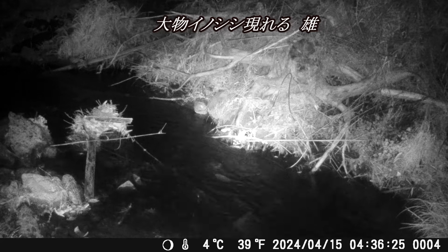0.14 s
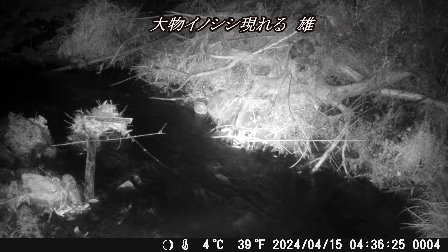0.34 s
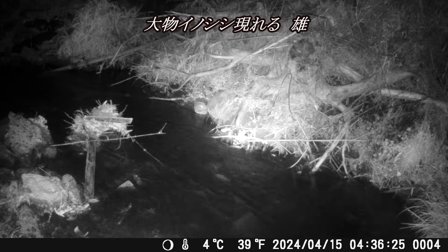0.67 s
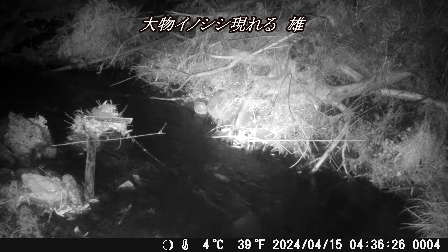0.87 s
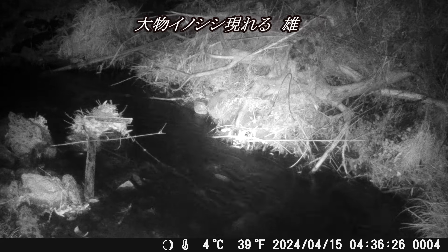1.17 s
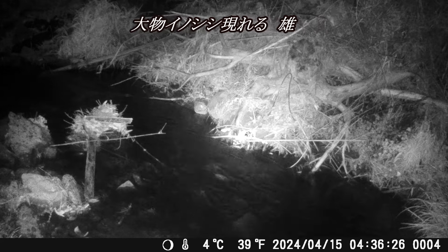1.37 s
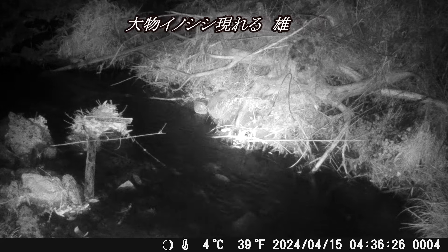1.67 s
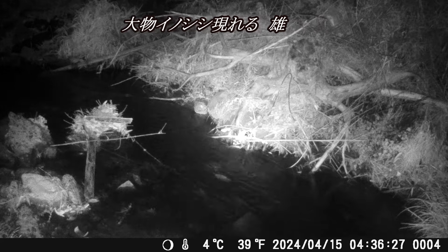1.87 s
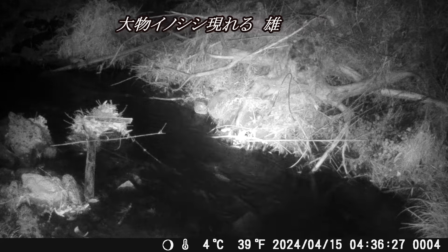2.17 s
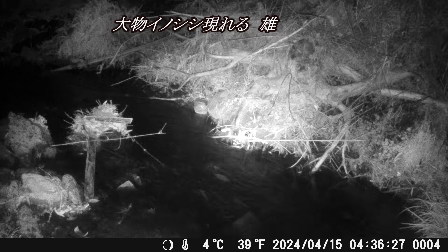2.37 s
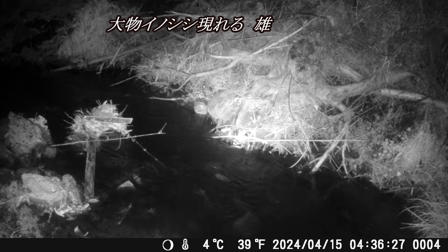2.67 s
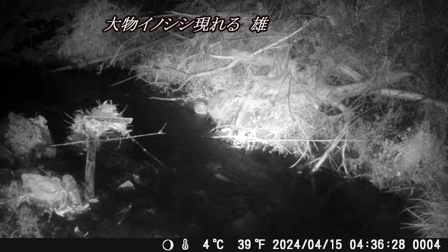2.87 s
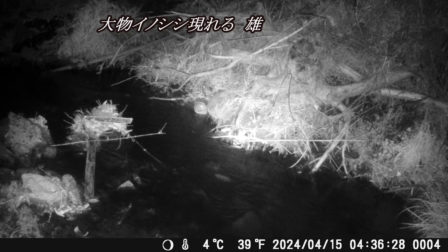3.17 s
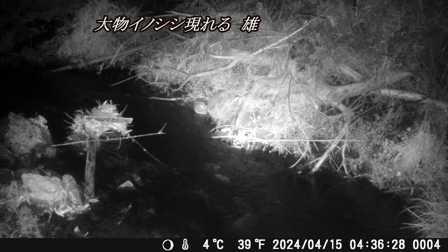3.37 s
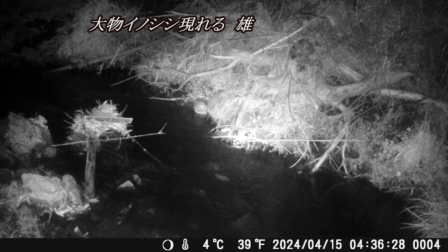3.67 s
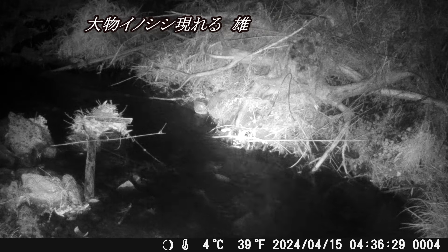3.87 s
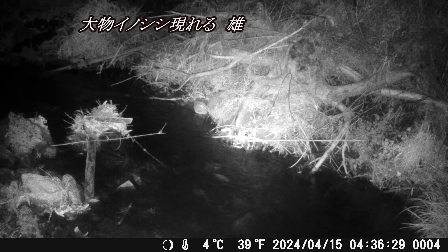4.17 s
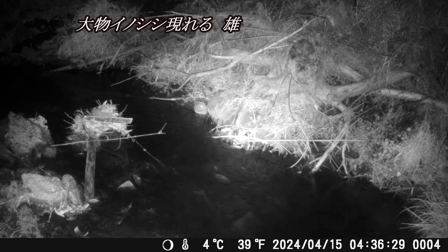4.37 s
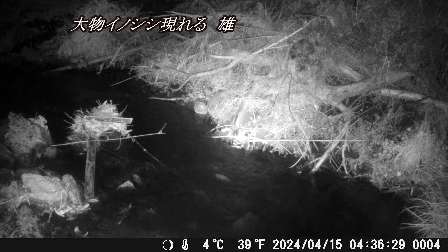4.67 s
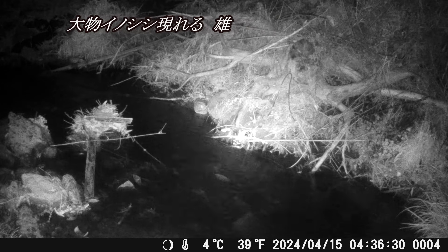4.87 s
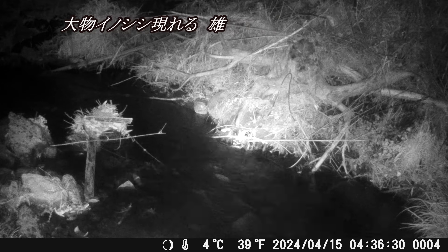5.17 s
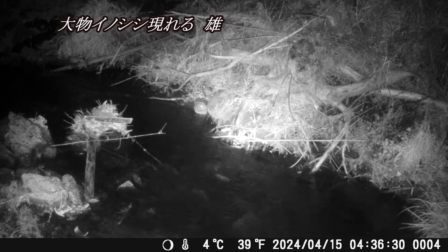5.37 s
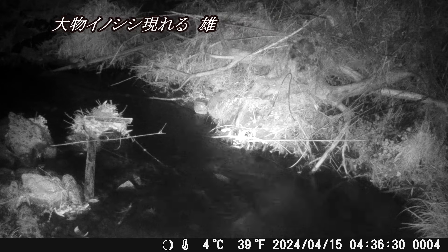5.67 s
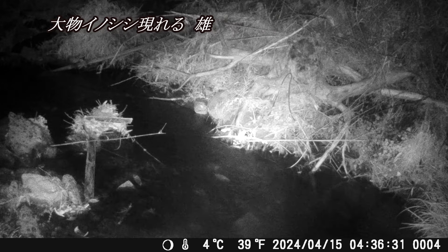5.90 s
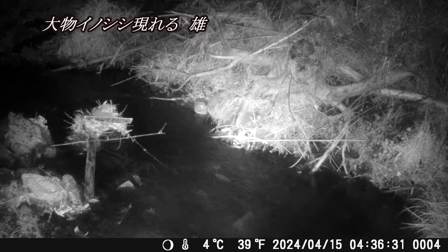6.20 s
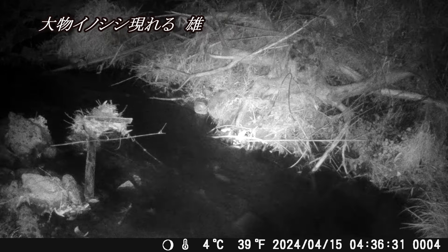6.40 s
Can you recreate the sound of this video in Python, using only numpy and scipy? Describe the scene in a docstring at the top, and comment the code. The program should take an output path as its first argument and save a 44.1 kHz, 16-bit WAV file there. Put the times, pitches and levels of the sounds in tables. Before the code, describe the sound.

A shallow stream trickles softly in the open throughout, a faint wash dotted with tiny bubbles. In the first second, light drips and ticks plink; a sharper click lands at about 1.5 s over a faint, low engine hum. From 2.2 to 2.7 s an unseen animal makes a quick cluster of small splashes. A vehicle on a road some way off then swells, its deep rumble and soft roar strongest from about 2.8 to 3.7 s, with a brief whine near 3.5 s. At 3.6 s wading resumes, with bright slaps, fizz and gurgles crowding together most densely from 3.9 to 4.7 s while the vehicle fades to a low hum. After 5 s the splashes become smaller and sparser, with isolated drips and upward-gliding bubbles until 6.5 s. The small microphone dulls the treble and adds faint hiss; short echoes come off the banks.

```python
"""Wading through a shallow stream

A shallow stream trickles at night: bands of noise with small ringing bubbles standing out of them.
A vehicle passes on a road some way off: shaped noise for rumble and roar, sines for hum and whine.
An animal wades through the water out of sight: bursts of fizz and gurgle, with ringing drops and bubbles.
A small microphone rolls off steeply above about 3 kHz and adds a faint hiss."""
import sys
import numpy as np
from scipy import signal
from scipy.io import wavfile
from scipy.ndimage import uniform_filter1d

SR = 44100
rng = np.random.default_rng(int(sys.argv[2]) if len(sys.argv) > 2 else 0)


def log_audio(samples):
    """Write samples as a 16-bit WAV file to the path given in sys.argv[1]."""
    # one column per channel
    frames = np.atleast_2d(samples).T
    # limit to full scale, then quantise
    limited = np.clip(frames, -1, 1)
    pcm = np.round(limited * 32767).astype(np.int16)
    wavfile.write(sys.argv[1], SR, pcm)


N = 288414

# how hard the water is stirred between splashes: (time [s], level [dB])
STIR = [(0.0, -51.5), (0.14, -60), (2.02, -61), (2.4, -56.5), (3.01, -56), (3.52, -70), (3.99, -49.5),
        (4.35, -56), (4.6, -53), (5.45, -53.5), (6.54, -58.5)]


def amp(db):
    """Decibels to an amplitude factor."""
    return 10 ** (np.asarray(db) / 20)


def evened(x):
    """Scale to an RMS of 1."""
    return x / np.sqrt(np.mean(x ** 2) + 1e-20)


def read(points, hz):
    """Level of a spectral curve at hz, straight between its points on a log frequency axis."""
    f, value = np.transpose(points)
    return np.interp(np.log(hz + 1), np.log(f + 1), value)


def along(rows):
    """Each column of a table of curves, one value a sample."""
    s, *columns = np.transpose(rows)
    return [np.interp(np.arange(N) / SR, s, c) for c in columns]


def add(mix, s, sound):
    """Mix a sound in place from s seconds on, cut at the end."""
    part = mix[round(s * SR):][:len(sound)]
    part += sound[:len(part)]


def noise(points, size, patchy_db):
    """Shaped noise from random short-time spectra with smooth louder and softer patches; RMS 1."""
    frames, hz = 4 * N // size + 5, np.fft.rfftfreq(size, 1 / SR)
    real, imag, patches = np.moveaxis(rng.standard_normal((frames, len(hz), 3)), 2, 0)
    patches = uniform_filter1d(patches, size=8, axis=0)  # smooth in time
    patches = evened(uniform_filter1d(patches, size=8, axis=1))  # smooth in frequency
    spectra = (real + 1j * imag) * amp(read(points, hz) + patchy_db * patches)
    sound = signal.istft(spectra.T, nperseg=size, noverlap=3 * size // 4)[1]
    return evened(sound[:N])


def ping(hz, t60, rise=0., ramp=1.0):
    """A dying sine, as of ringing trapped air; climbs rise octaves/s, starts over ramp cycles; peak 1."""
    t = np.arange(int(max(t60, 1e-3) * SR)) / SR
    turns = np.cumsum(hz * 2 ** (rise * t)) / SR
    attack = np.minimum(t * hz / ramp, 1)
    ring = np.sin(2 * np.pi * turns) * amp(-60 * t / t60) * attack
    return ring / abs(ring).max()


def grains(points, per_s, cycles, spread_db, top_hz=6000, count=16):
    """Many small bubbles of count pitches ring at random moments, a few much stronger; RMS 1."""
    happens = rng.random(N) < per_s / SR
    size = amp(spread_db * np.minimum(rng.exponential(1, N), 5)) * happens
    kind, out = rng.integers(0, count, N), np.zeros(N)
    for k, hz in enumerate(np.geomspace(350, top_hz, count)):
        grain = ping(hz, np.log(1000) * cycles / hz / np.pi, rise=15.0)
        grain_level = amp(read(points, hz)) * np.sqrt(hz) / np.linalg.norm(grain)
        out += grain_level * signal.oaconvolve(size * (kind == k), grain)[:N]
    return evened(out)


def stream():
    """Countless far bubbles blur into a wash, with nearer bubbles standing out of it."""
    # spectrum of the wash: (frequency [Hz], relative density [dB per Hz])
    wash_curve = [(12, -37), (25, -2.5), (70, 1), (100, -8), (140, -24.5), (270, -18.5), (400, -21),
                  (1000, -28.5), (1600, -16), (2400, -14.5), (3200, -20), (7000, -22.5)]
    near = grains(wash_curve, per_s=980.0, cycles=11.0, spread_db=8.5)
    wash = noise(wash_curve, size=1024, patchy_db=3.0)
    return amp(-55) * wash + amp(-67.0) * near


def road_noise():
    """Low rumble, exhaust boom, body drone and tyre roar: four noise bands that swell as the vehicle passes."""
    # the pass: (time [s], rumble level [dB], drone level [dB], roar level [dB])
    pass_curves = [(0.0, -49, -71.5, -66), (1.0, -48, -68.5, -63.5), (1.53, -46.5, -67, -61.5),
                   (2.18, -51, -66.5, -61), (2.39, -42.5, -64, -59), (2.58, -50, -66.5, -56),
                   (2.77, -34, -55, -51.5), (2.93, -30, -52, -48), (3.26, -35, -49, -45.5),
                   (3.52, -31.5, -52, -46), (3.7, -32, -51, -48), (4.02, -41, -60.5, -58),
                   (4.4, -46.5, -57, -60), (4.88, -50.5, -59, -62.5), (5.2, -39, -64, -57.5),
                   (5.43, -44.5, -66, -65), (5.88, -53.5, -71.5, -61.5), (6.14, -40, -65, -63.5),
                   (6.54, -48.5, -70.5, -64.5)]
    # the exhaust boom: (time [s], level [dB])
    boom_curve = [(0.0, -69.5), (1.0, -68.5), (1.5, -65), (2.3, -60.5), (2.6, -58.5), (2.8, -48.5),
                  (3.5, -51), (4.0, -58), (4.4, -66), (4.85, -68), (5.15, -64.5), (5.8, -73.5),
                  (6.03, -60.5), (6.54, -79)]
    # spectra of the four bands: (frequency [Hz], relative density [dB per Hz])
    rumble_band = [(12, -8), (25, 6.5), (65, -5.5), (95, -22), (130, -59)]
    boom_band = [(70, -23.5), (100, 2), (140, 0), (175, 0), (210, -32.5)]
    drone_band = [(160, -27), (200, -3.5), (245, -0.5), (285, -6), (340, -12), (450, -36.5)]
    roar_band = [(280, -17.5), (460, -4), (800, -1), (1120, 1.5), (1530, -7), (2800, -10.5), (6000, -36.5)]

    rumble_db, drone_db, roar_db = along(pass_curves)
    boom_db, = along(boom_curve)
    rumble = noise(rumble_band, size=4096, patchy_db=0)
    rumble /= np.sqrt(uniform_filter1d(rumble ** 2, size=6000))  # steady over about 0.14 s
    out = amp(rumble_db) * rumble
    out += amp(boom_db) * noise(boom_band, size=2048, patchy_db=0.5)
    out += amp(drone_db) * noise(drone_band, size=2048, patchy_db=1.5)
    out += amp(roar_db) * noise(roar_band, size=512, patchy_db=1.5)
    return out


def tone(rows, orders):
    """A sine on a curve of pitch and level, with overtones; each partial wavers in level at random."""
    waver_db, overtone_waver_db, waver_s = 1.5, 2.5, .05
    s, *columns = np.transpose(rows)
    t = np.arange(s[0], s[-1], 1 / SR)
    hz, db = (np.interp(t, s, c) for c in columns)
    turns, span = np.cumsum(hz) / SR, int(waver_s * SR)
    chance = rng.standard_normal((N, len(orders) + 1)).T
    waver = evened(uniform_filter1d(uniform_filter1d(chance, span), span))[:, :len(t)]
    wave = amp(waver_db * waver[0]) * np.sin(2 * np.pi * turns)
    for (order, order_db), own in zip(orders, waver[1:]):
        wave += amp(order_db + overtone_waver_db * own) * np.sin(2 * np.pi * order * turns)
    fades = signal.windows.tukey(len(t), .1)
    return s[0], np.sqrt(2) * amp(db) * wave * fades


def engine_hum():
    """The engine hums at its firing rate and low multiples of it, in four stretches."""
    # one list a stretch: (time [s], firing rate [Hz], level of the fundamental [dB])
    stretches = [
        [(1.15, 68.6, -59.5), (1.622, 67.1, -52), (1.9, 67.7, -57.5), (2.068, 79.5, -50), (2.1, 80.1, -58)],
        [(2.7, 56.4, -46), (2.956, 56.8, -35), (3.194, 57.3, -47), (3.31, 65.1, -49), (3.466, 69.4, -43.5),
         (3.596, 68.3, -35), (3.7, 66.5, -52)],
        [(3.75, 54.5, -58), (3.91, 54.07, -45.5), (4.3, 53.68, -45.5), (4.72, 54.52, -43), (4.92, 54.8, -52),
         (5.0, 55.15, -46.5), (5.25, 52.6, -46)],
        [(5.22, 54.9, -55), (5.37, 58.93, -44), (5.51, 62.5, -53.5), (6.4, 63.23, -59)],
    ]
    # overtones: (multiple of the firing rate, level before the stretch's own offset [dB])
    hum_orders = [(2, -19), (3, -19.5), (4, -19.5)]
    # offset of all overtones, one a stretch: level [dB]
    overtone_offsets = [-3.5, -11, -0.5, -4.5]
    out = np.zeros(N)
    for rows, over_db in zip(stretches, overtone_offsets):
        orders = [(order, db + over_db) for order, db in hum_orders]
        add(out, *tone(rows, orders))
    return out


def whine():
    """Three short swells of a steady sine near 250 Hz as the vehicle goes by."""
    # the swells: (time of the top [s], pitch [Hz], RMS level at the top [dB])
    swells = [(3.45, 244.7, -39.5), (3.572, 252.7, -42.5), (3.735, 264.6, -43.5)]
    slope_db_per_s = 450  # up to the top and down again
    t = np.arange(N) / SR
    out = np.zeros(N)
    for s, hz, db in swells:
        level = np.sqrt(2) * amp(db - slope_db_per_s * abs(t - s))
        out += level * np.sin(2 * np.pi * hz * t)
    return out


def vehicle():
    """The passing vehicle: broad road noise with the engine's hum and a brief whine."""
    return road_noise() + engine_hum() + whine()


def splashing():
    """Stirred water: bubble fizz over a rush; each footfall swells it, with its own share of low gurgle."""
    # spectrum of the water: (frequency [Hz], relative density [dB per Hz])
    splash_curve = [(250, -25), (420, -11.5), (700, -18.5), (1000, -8), (1500, -6), (2000, -3.5), (2600, 3),
                    (3500, 0.5), (7000, -10)]
    # splashes of a wading foot: (start [s], level [dB], fall by 60 dB [s], tilt of the low half [dB])
    footfalls = [(2.244, -43.5, 0.052, 5), (2.345, -52, 0.08, 3), (2.42, -49.5, 0.45, -0.5),
                 (2.569, -40, 0.062, -12), (2.63, -46, 0.091, 5), (3.595, -45, .1, 0),
                 (3.625, -40, 0.22, -24), (3.675, -38.5, 0.22, 6), (3.76, -47.5, 0.36, 12),
                 (3.897, -35.5, 0.19, 2), (3.955, -46, 0.43, 8), (4.02, -37, 0.17, 7.5),
                 (4.054, -39, 0.07, 5), (4.205, -40.5, 0.2, -5), (4.234, -40.5, 0.44, 7.5),
                 (4.3, -44, 0.52, 3.5), (4.48, -42, 0.063, -6), (4.555, -43, 0.39, 6),
                 (4.625, -48, 0.56, 10.5), (4.685, -40, 0.23, 1), (4.845, -45.5, 0.27, -5),
                 (4.915, -45.5, 0.11, -13), (4.97, -43, 0.1, -7), (5.045, -50, 0.054, -4),
                 (5.17, -55, 0.6, 10), (5.509, -48.5, 0.27, -1), (5.569, -59.5, 0.25, 21),
                 (5.729, -47, 0.13, 10), (6.227, -46, 0.07, 6)]
    stir_gurgle_db, rise_share = 2.4, 0.088  # low tilt of the stirring; rise as a share of the fall time

    level_db, = along(STIR)
    high_power, low_power = amp(level_db) ** 2, amp(level_db + stir_gurgle_db) ** 2
    for s, db, t60, gurgle_db in footfalls:
        rise = rise_share * t60
        t = np.arange(int((rise + t60) * SR)) / SR
        swell = np.minimum(t / rise, 1) * amp(db - 60 * np.maximum(t - rise, 0) / t60)
        add(high_power, s, swell ** 2)
        add(low_power, s, (amp(gurgle_db) * swell) ** 2)

    fizz = grains(splash_curve, per_s=2500., cycles=5.9, spread_db=1.0)
    rush = noise(splash_curve, size=256, patchy_db=4.5)
    water = evened(fizz + 1.36 * rush)
    low = signal.sosfiltfilt(signal.butter(2, 1500, fs=SR, output="sos"), water)
    high = water - low
    # larger pockets of air
    gurgle = grains(splash_curve, per_s=300., cycles=3.0, spread_db=3.0, top_hz=1410, count=8)
    return np.sqrt(high_power) * high + np.sqrt(low_power) * (low + 0.14 * gurgle)


def small_drops():
    """Fainter drops at random moments, louder where the water is stirred harder; rows as in drops()."""
    count, low_hz, high_hz, over_stir_db = 60, 1900, 4180, 10
    when, pitch, tick = rng.random((count, 3)).T
    s = when * N / SR
    db = np.interp(s, *np.transpose(STIR)) + over_stir_db
    hz = low_hz * (high_hz / low_hz) ** pitch
    return list(zip(s, db, hz, tick))


def drops():
    """Each drop mixes a tick of a few cycles with a longer ring whose pitch climbs."""
    # the loudest drops and slaps:
    # (time [s], level shared by ring and tick [dB], starting pitch [Hz], share of broad tick [0-1])
    loud_drops = [(0.0619, -33, 2400, 1), (0.134, -45, 2150, 0.4), (0.1897, -38, 2350, 1),
                  (0.3323, -45.5, 2550, 0.2), (0.4487, -37.5, 2870, 0), (0.534, -37, 2600, 0.2),
                  (0.6703, -41, 2040, 0), (0.734, -36, 3850, 0), (1.254, -43, 2440, 0.4),
                  (1.538, -23.5, 5300, 0.3), (1.5863, -45.5, 1850, 0), (1.6306, -44, 1930, 0.1),
                  (1.8623, -44.5, 3080, 0.2), (1.9, -43, 3560, 0.1), (2.05, -45.5, 3660, 0),
                  (2.129, -46, 2300, 0), (2.246, -33.5, 2740, 0), (2.3459, -31, 2550, 0.65),
                  (2.3957, -32, 5670, 0.5), (2.4094, -37, 2720, 0.25), (2.4254, -34, 2690, 0.16),
                  (2.4453, -33.5, 1980, 0.6), (2.508, -39, 2580, 0.3), (2.574, -37, 2030, 0.7),
                  (2.6297, -29.5, 2690, 0.25), (2.634, -30.5, 2210, 0.1), (3.5968, -30, 2510, 0.59),
                  (3.604, -39, 2400, 0.58), (3.6288, -28.5, 2420, 0), (3.6512, -21.5, 3270, 0.34),
                  (3.6772, -29, 2660, 0.65), (3.6956, -35, 2770, 0.5), (3.8995, -27, 3020, 1),
                  (3.9066, -21.5, 2370, 0.66), (3.916, -43, 2940, 0.3), (3.9288, -31.5, 2570, 0.2),
                  (4.002, -31.5, 3170, 0.27), (4.038, -31, 2670, 0.4), (4.076, -41, 2660, 0.2),
                  (4.2145, -37, 2420, 0.3), (4.241, -29.5, 2670, 0.7), (4.242, -24, 5000, 0.7),
                  (4.258, -27.5, 2450, 0.5), (4.2736, -27, 2350, 0.6), (4.28, -29, 2420, 0.28),
                  (4.326, -35, 2060, 0.1), (4.415, -36.5, 2730, 0.3), (4.4865, -33.5, 2735, 0.7),
                  (4.5186, -36, 2920, 0.8), (4.562, -36, 2830, 0.2), (4.5677, -33, 2710, 1),
                  (4.5814, -29.5, 2500, 1), (4.585, -27, 6360, 0.7), (4.6605, -30.5, 2180, 0.6),
                  (4.9498, -31, 5470, 0.55), (4.9725, -35, 2830, 0.09), (4.9855, -37, 2800, 0),
                  (5.003, -39.5, 2570, 0.6), (5.05, -44, 2200, 0.7), (5.1835, -33, 2180, 1),
                  (5.2269, -34.5, 2420, 0.86), (5.299, -36, 1960, 0.7), (5.3588, -36, 2500, 0.4),
                  (5.5194, -31.5, 3050, 0.65), (5.616, -35.5, 2740, 0.44), (5.647, -38, 2660, 0.3),
                  (5.777, -39.5, 2480, 0.15), (5.8314, -38.5, 2970, 0.37), (5.974, -35.5, 3030, 0.9),
                  (6.054, -38, 2040, 0.74), (6.2334, -39, 2897, 1), (6.496, -39, 2230, 1)]
    ring_cycles = 34.7  # until a pure ring is 60 dB down; fewer the more the drop is a tick
    out = np.zeros(N)
    for s, db, hz, tick in [*loud_drops, *small_drops()]:
        ring_s = ring_cycles * (1 - 0.38 * tick) / hz
        add(out, s, amp(db) * (1 - tick) * ping(hz, ring_s, rise=4.5))
        add(out, s, 1.6 * amp(db) * tick * ping(hz, 4.5 / hz, ramp=.8))
    return out


def bubble(first_hz, last_hz, length):
    """A larger bubble swells and fades while its pitch glides; random ripples shake pitch and level."""
    u = np.linspace(0, 1, int(length * SR))
    ripple = evened(uniform_filter1d(rng.standard_normal((2, 2400)), size=120))[:, :len(u)]
    hz = first_hz * (last_hz / first_hz) ** (u ** 1.1) * (1 + 0.066 * ripple[0])
    turns = np.cumsum(hz) / SR
    swell = np.sin(np.pi * u ** .7) ** 0.76
    return np.sin(2 * np.pi * turns) * swell * amp(1.4 * ripple[1])


def small_bubbles():
    """Fainter bubbles at random moments, louder where the water is stirred harder; rows as in bubbles()."""
    count, low_hz, high_hz, over_stir_db = 60, 780, 2200, 1
    most_climb, mean_cycles = 0.27, 24.  # octaves; cycles before the cap on length
    when, pitch, climb, cycles = rng.random((count, 4)).T
    s = when * N / SR
    hz = low_hz * (high_hz / low_hz) ** pitch
    db = np.interp(s, *np.transpose(STIR)) + over_stir_db
    length = np.minimum(mean_cycles * (.5 + cycles) / hz, .05)
    return list(zip(s, db, hz, most_climb * climb, length))


def bubbles():
    """Larger bubbles sing one by one, most of them gliding upward."""
    # the loudest bubbles, before the ripples:
    # (time [s], peak level [dB], first pitch [Hz], climb [octaves], length [s])
    loud_bubbles = [(0.385, -54.5, 1090, 0.2, 0.033), (0.423, -58, 1102, -0.045, 0.036),
                    (0.455, -54, 1200, 0.18, 0.024), (0.635, -50.5, 1360, 0.18, 0.012),
                    (0.759, -57, 601, 0.56, 0.039), (0.868, -55, 930, 0.24, 0.012),
                    (1.66, -57.5, 657, 0.49, 0.028), (2.008, -53, 1550, 0.039, 0.018),
                    (2.346, -49.5, 710, 0.26, 0.011), (2.365, -45.5, 1410, 0.082, 0.0084),
                    (2.474, -45, 1230, 0.017, 0.0072), (2.513, -51, 601, .9, 0.052),
                    (2.66, -50.5, 620, -0.012, 0.032), (3.713, -42.5, 1060, -0.11, 0.013),
                    (3.932, -42.5, 1090, 0.16, 0.011), (3.934, -46, 460, 0.016, 0.028),
                    (3.961, -44, 666, 0.078, 0.036), (3.966, -49, 390, .17, 0.018),
                    (4.041, -28, 754, -0.00048, 0.0028), (4.048, -46.5, 383, 0.13, 0.037),
                    (4.115, -52, 970, -0.059, 0.018), (4.536, -40, 980, 0.29, 0.0074),
                    (4.621, -45, 716, 0.23, 0.01), (4.614, -48, 1230, -0.065, 0.052),
                    (4.636, -44, 740, 0.17, 0.014), (4.662, -48, 392, 0.059, 0.0093),
                    (4.698, -50.5, 750, .2, 0.011), (4.718, -43.5, 400, 0.76, 0.009),
                    (5.048, -50.5, 970, 0.17, 0.0097), (5.305, -53, 1413, 0.29, 0.028),
                    (5.363, -54, 793, 0.46, 0.051), (5.641, -47, 662, 0.55, 0.043),
                    (5.811, -52, 1260, 0.18, 0.014), (6.192, -54.5, 1050, 0.054, 0.019),
                    (6.365, -59.5, 970, 0.23, 0.026), (6.451, -50.5, 926, .05, 0.017)]
    out = np.zeros(N)
    for s, db, hz, climb, length in [*loud_bubbles, *small_bubbles()]:
        add(out, s, amp(db) * bubble(hz, hz * 2 ** climb, length))
    return out


def banks(x):
    """Sparse echoes from the banks and bushes, dying fast."""
    t = np.arange(4000) / SR
    signs = rng.choice([-1., 1.], 4000)
    sparse = rng.random(4000) < .05
    taps = signs * sparse * amp(-60 * t / 0.059) * (t > .002)  # 60 dB down in 59 ms
    return x + amp(-7.0) * signal.oaconvolve(x, taps / np.linalg.norm(taps))[:N]


def scene():
    """Stream, wading water and passing vehicle; only the drops and bubbles echo."""
    return (stream() + splashing() + banks(drops() + bubbles()) + vehicle())[None]


def record(dry):
    """The microphone's causal colour, its own hiss, then the band limit."""
    # the microphone's response: (frequency [Hz], gain [dB])
    mic_curve = [(20, -5.5), (2800, 1), (3400, -12.5), (4060, -24.5), (5200, -38), (7000, -22.5),
                 (9000, -36)]
    hiss_db, edge_hz = -89.5, 7350  # hiss RMS before the band limit
    log_gain = np.log(amp(read(mic_curve, abs(np.fft.fftfreq(8192, 1 / SR)))))
    # minimum phase: the Hilbert transform of the log gain gives the phase
    colour = np.fft.ifft(np.exp(np.conj(signal.hilbert(log_gain)))).real[:2048]
    heard = signal.oaconvolve(dry, colour[None])[:, :N]
    heard = heard + amp(hiss_db) * rng.standard_normal(dry.shape)
    band_limit = signal.firwin(801, edge_hz, window=("kaiser", 9), fs=SR)
    return signal.oaconvolve(heard, band_limit[None], "same")


dry = scene()
out = record(dry)
log_audio(out)
```